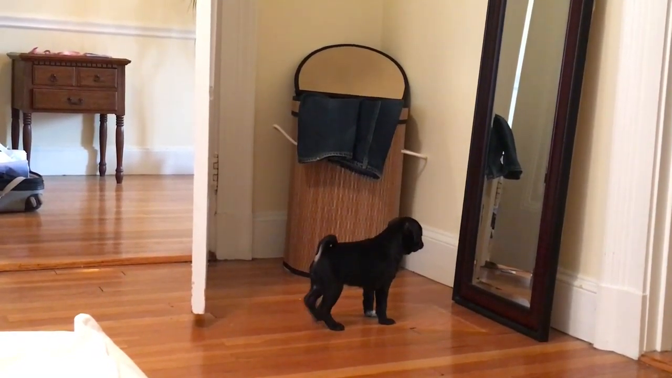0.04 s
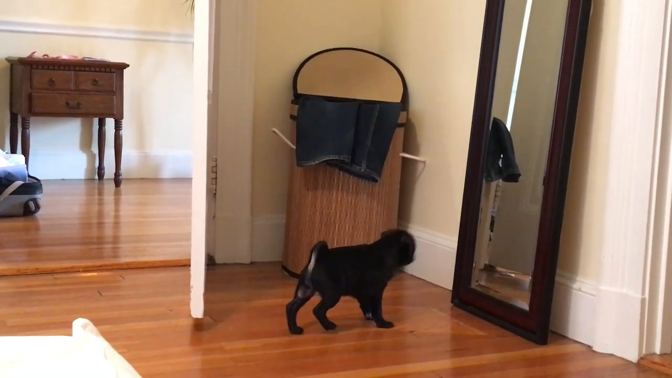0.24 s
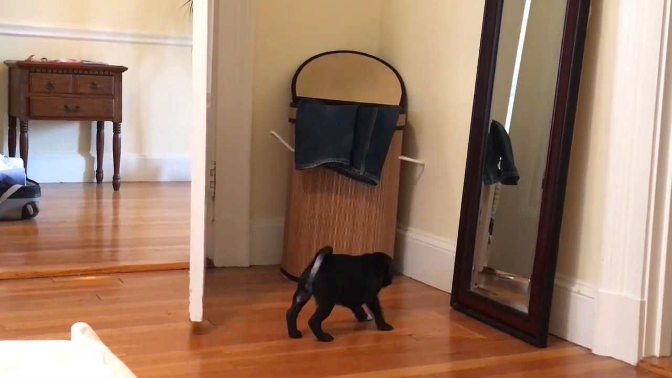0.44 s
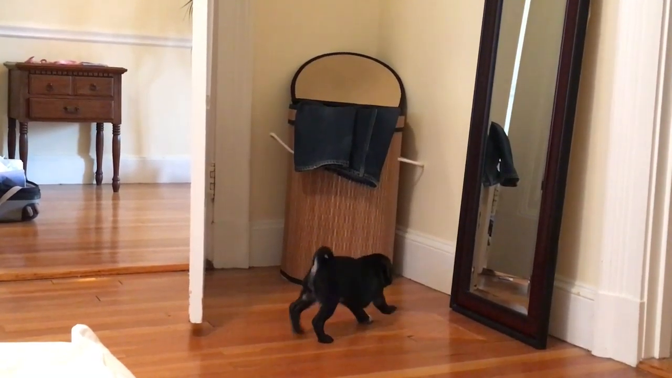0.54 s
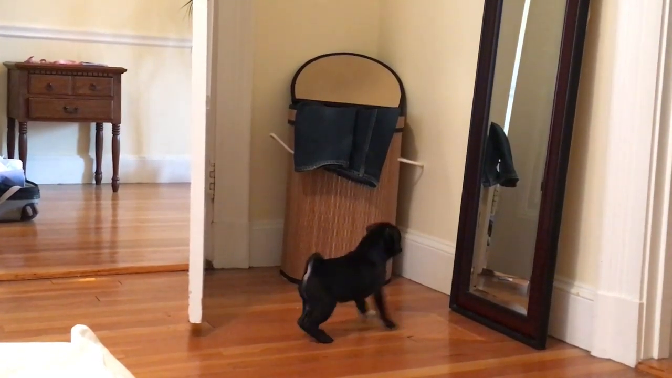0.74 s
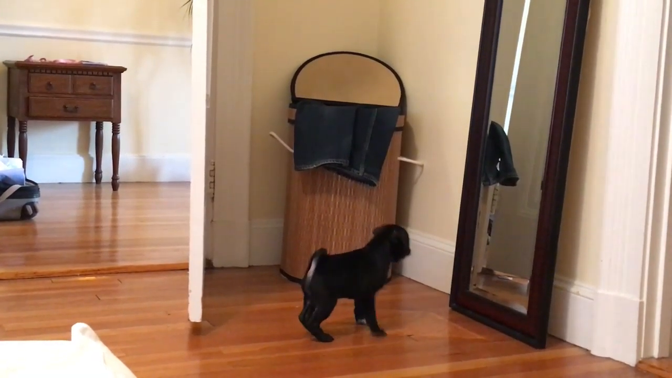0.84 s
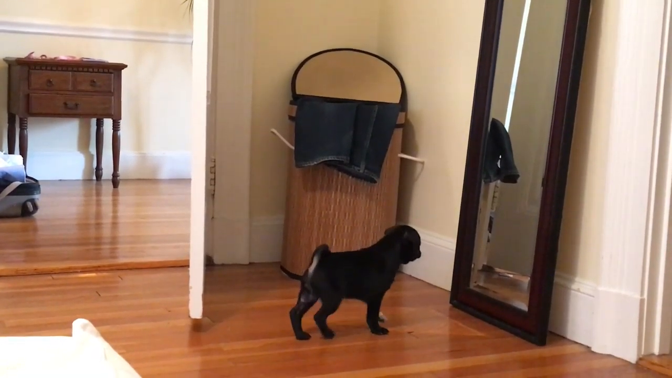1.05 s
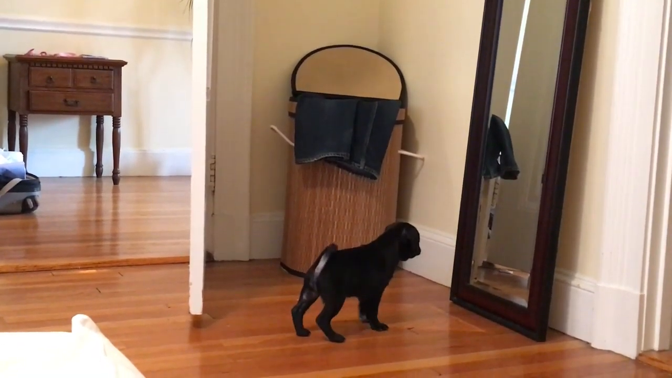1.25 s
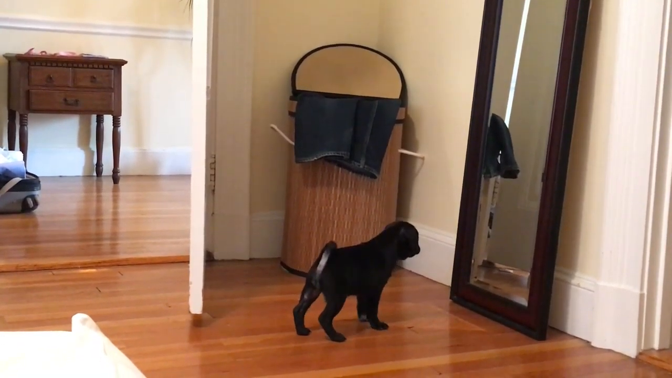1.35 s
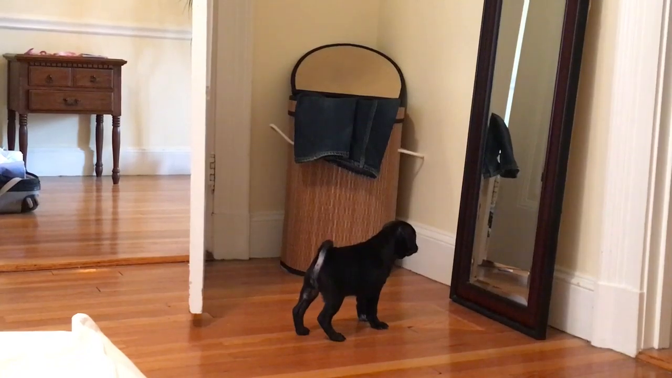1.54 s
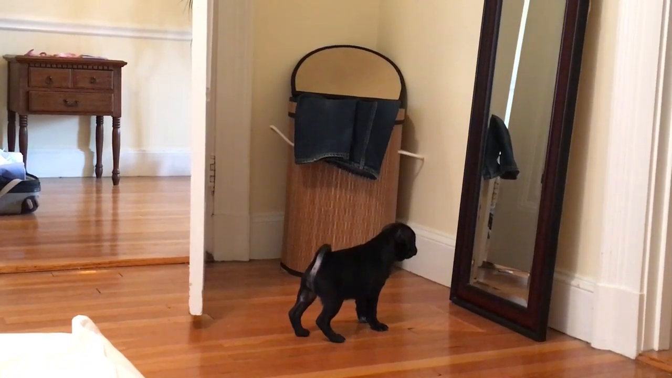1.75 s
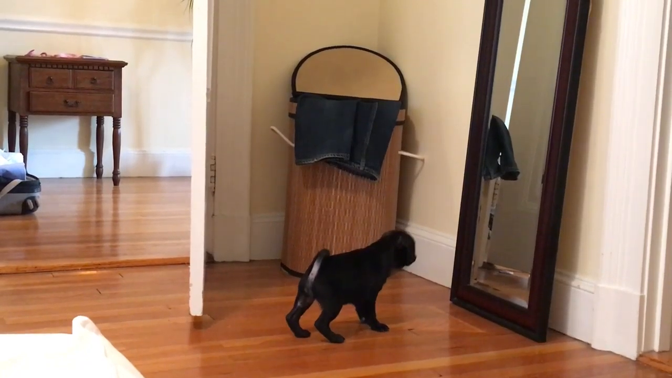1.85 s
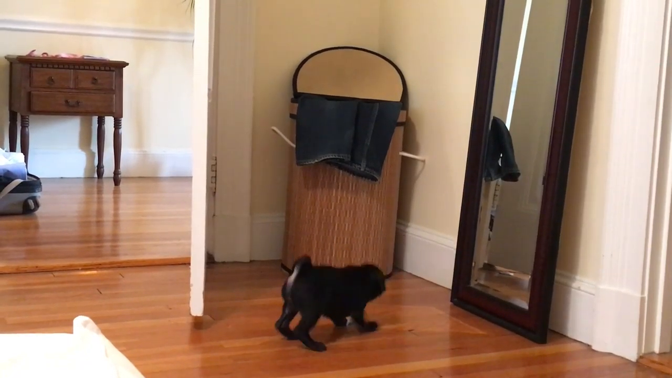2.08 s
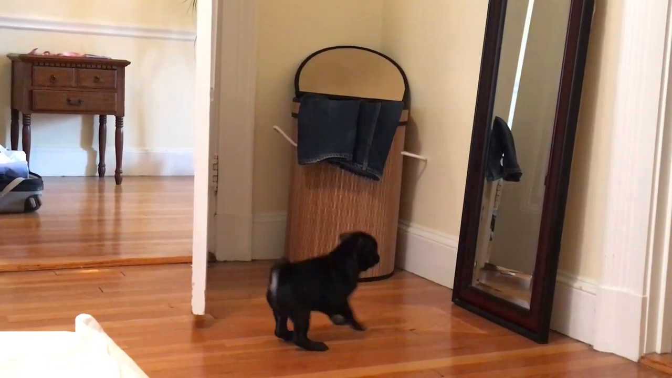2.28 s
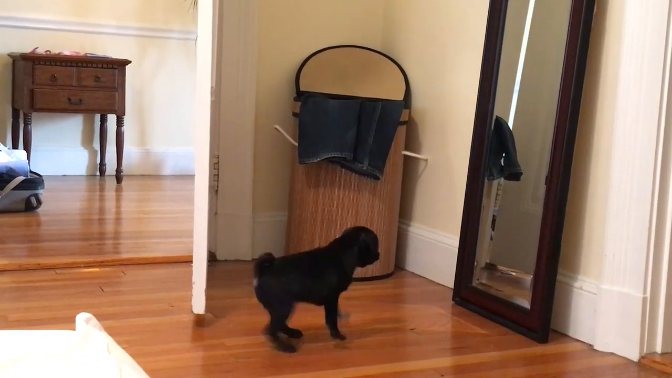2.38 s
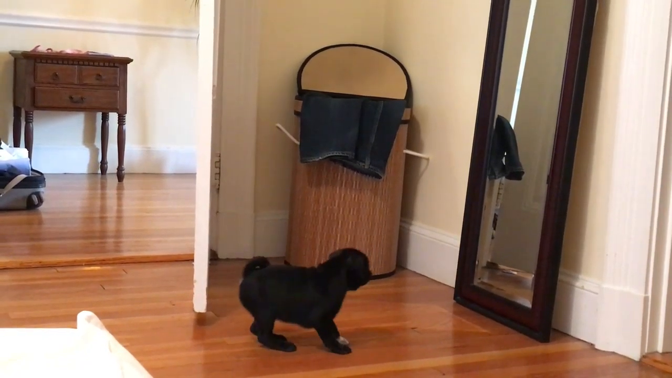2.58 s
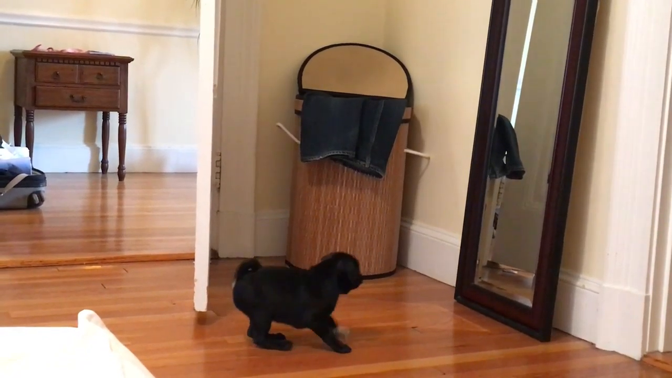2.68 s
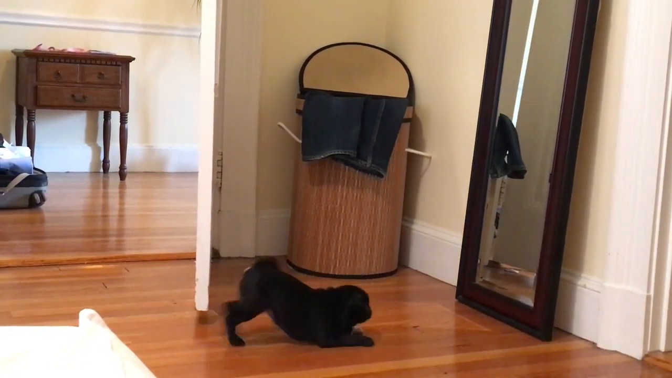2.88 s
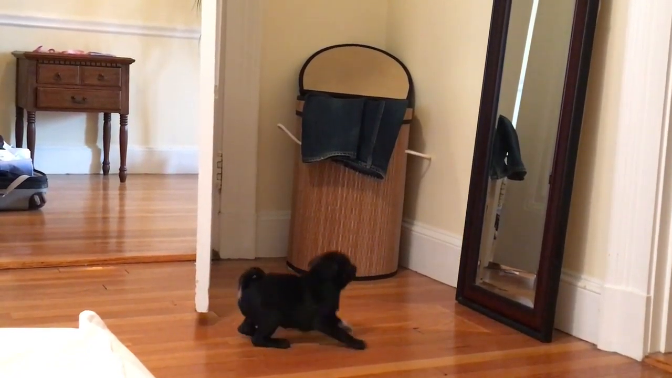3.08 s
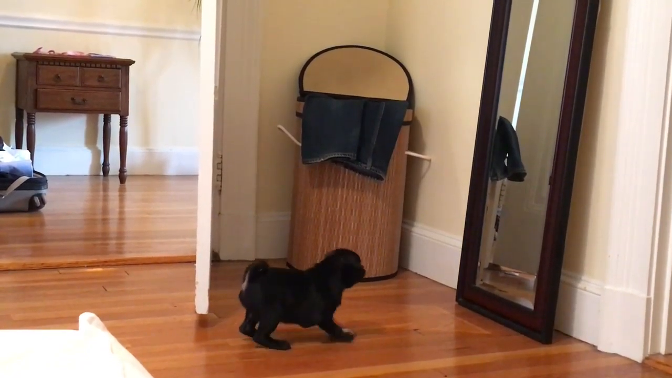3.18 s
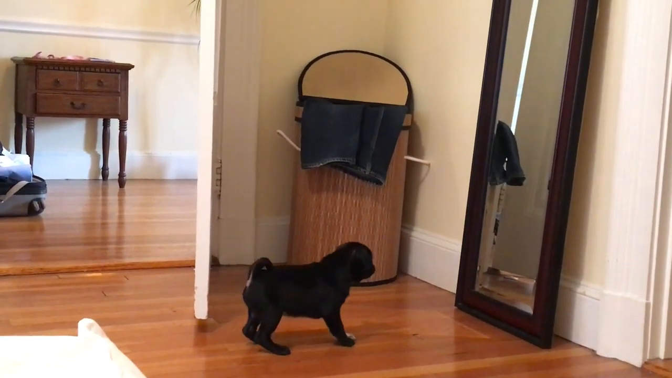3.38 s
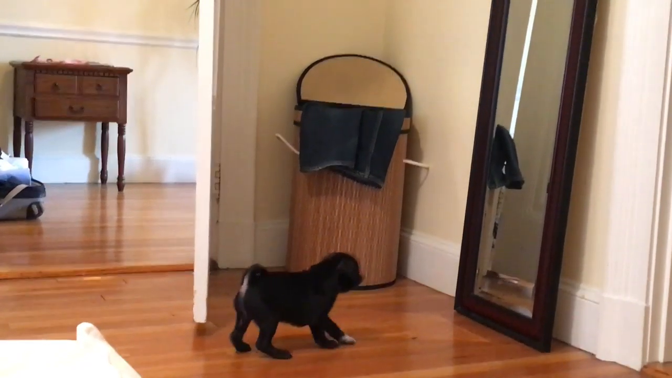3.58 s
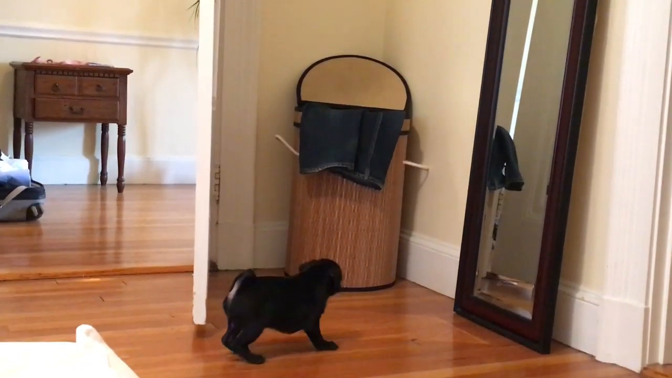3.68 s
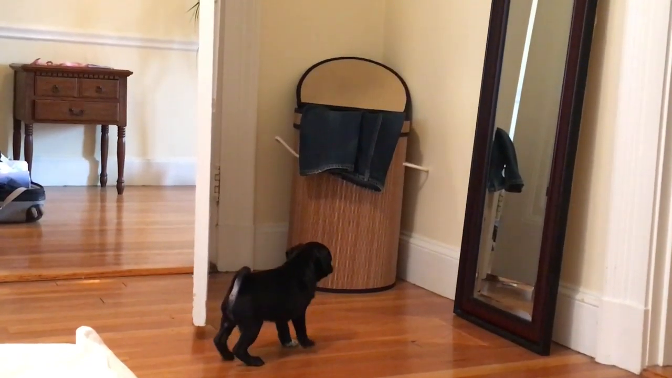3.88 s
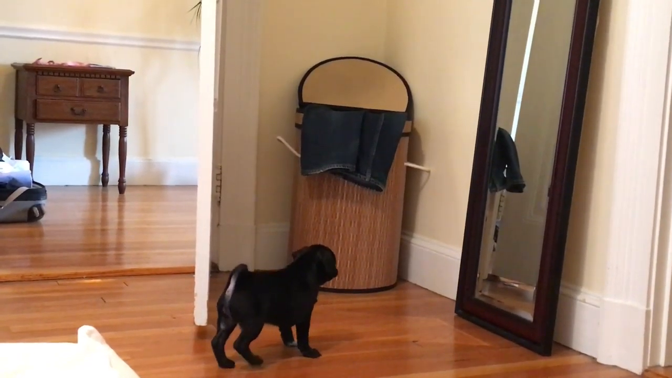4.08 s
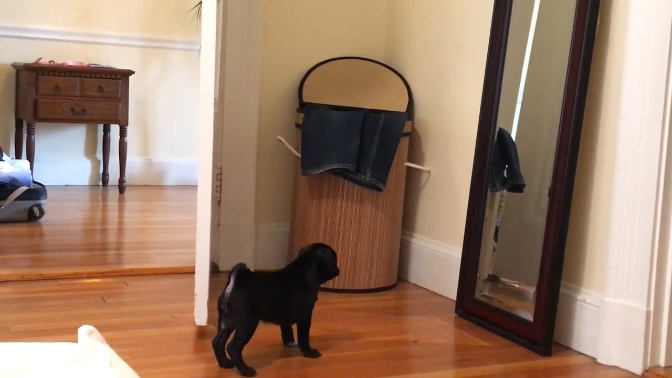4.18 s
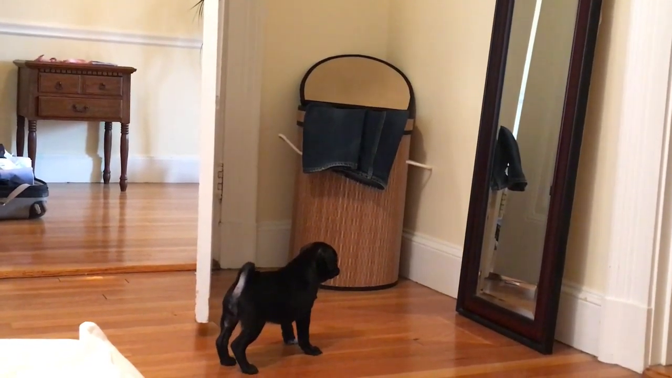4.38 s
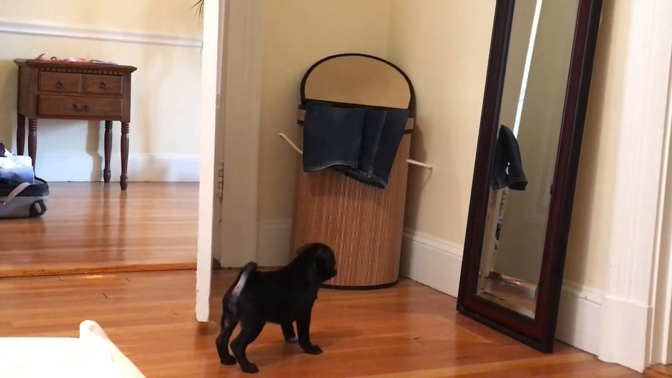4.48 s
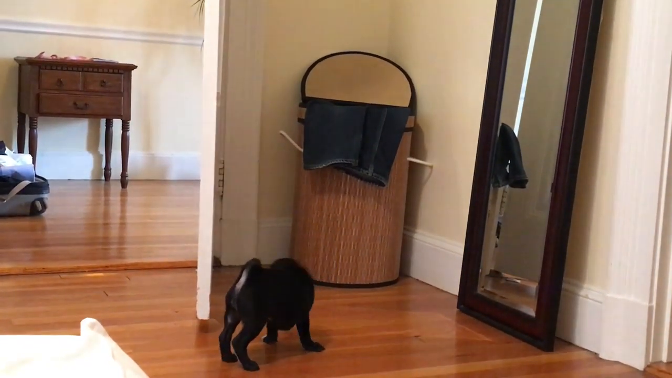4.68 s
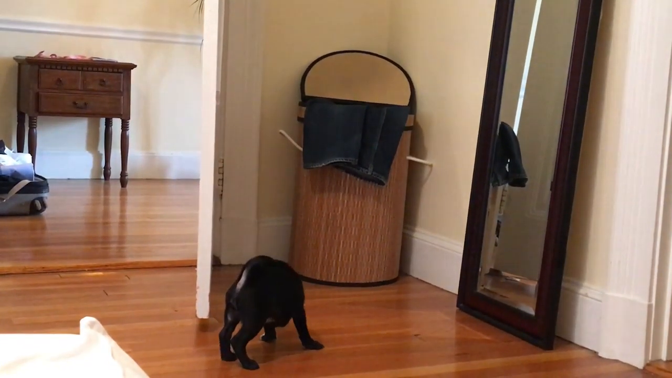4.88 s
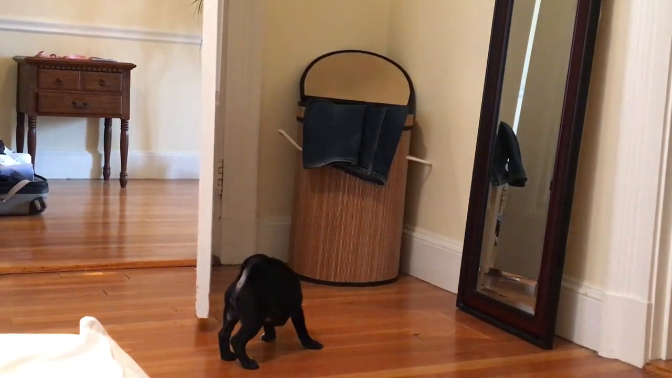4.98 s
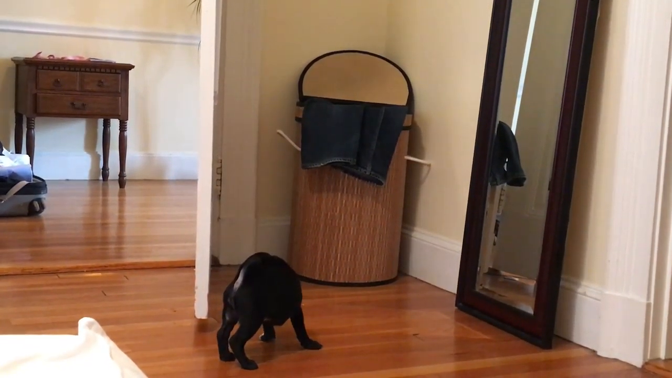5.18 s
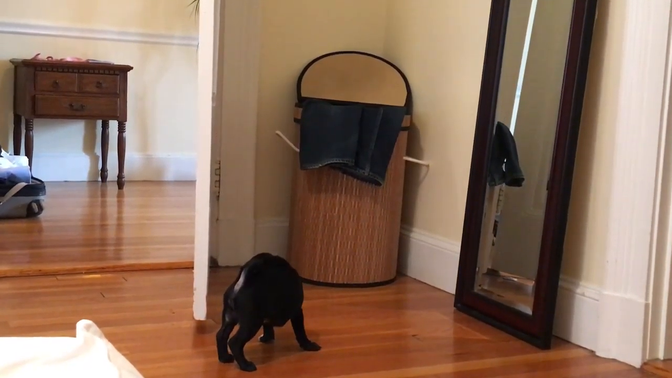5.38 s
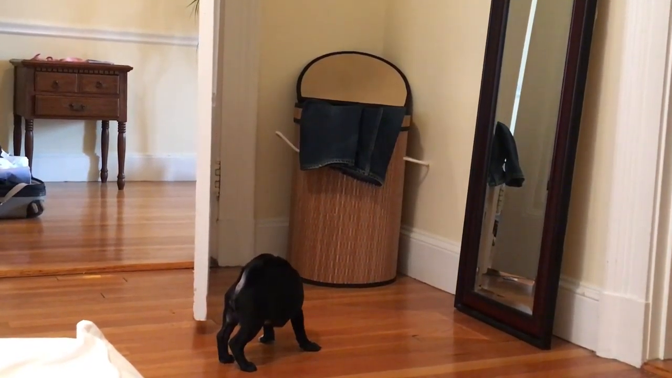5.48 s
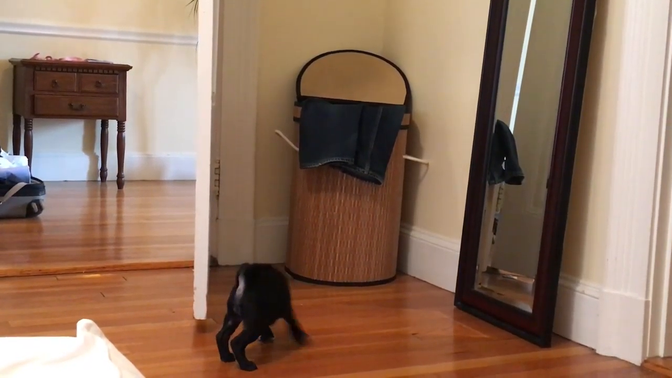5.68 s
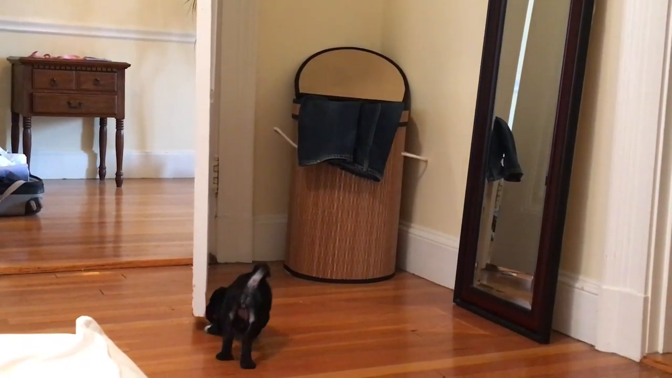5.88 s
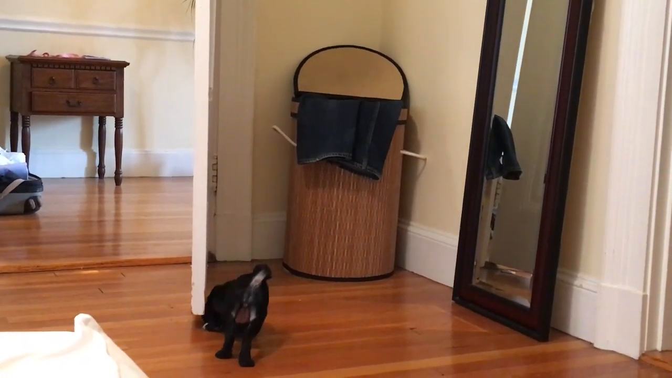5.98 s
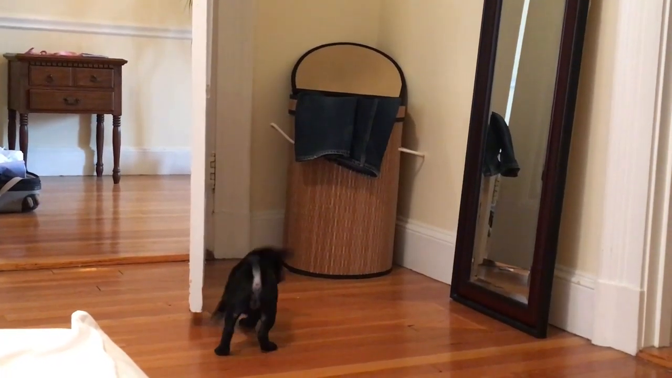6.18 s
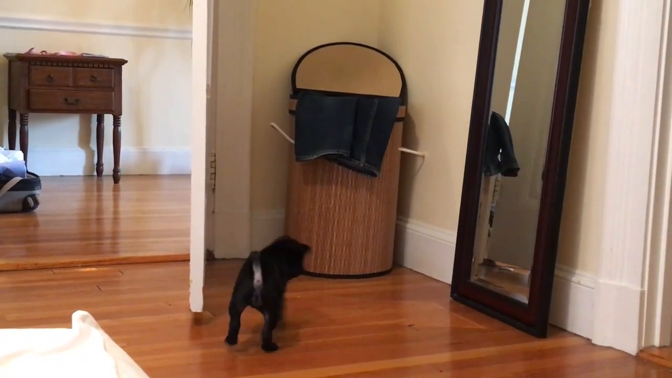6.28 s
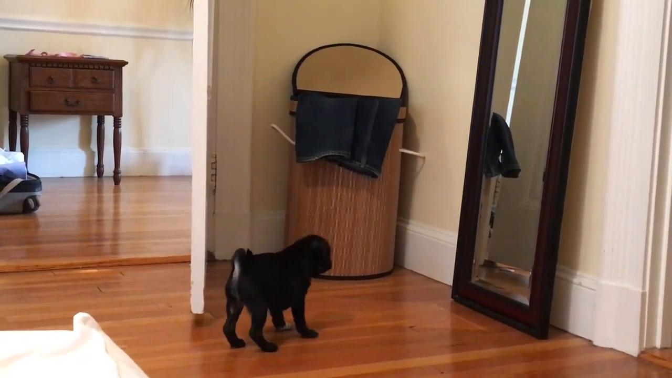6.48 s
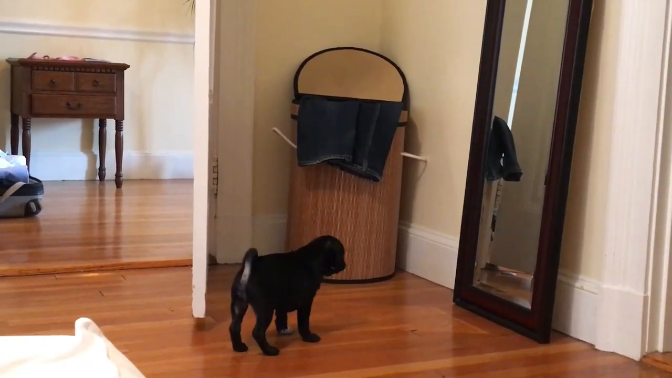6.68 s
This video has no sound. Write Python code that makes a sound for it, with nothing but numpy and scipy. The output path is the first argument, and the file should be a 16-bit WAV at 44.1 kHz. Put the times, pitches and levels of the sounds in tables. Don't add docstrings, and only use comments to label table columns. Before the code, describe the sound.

In a quiet, bare room with a wooden floor, a puppy scuffs about with ticking claws and a tiny squeak, then lets out a loud soaring yip and a rougher bark. Paws thump, a low growl sinks to a moan, and a rising whine follows. After a small yelp-grunt and more scuffling come a sinking whine and a weaker hoarse bark. One microphone a few steps away catches short wall echoes and faint house rumble.

```python
import sys
import numpy as np
from scipy import signal
from scipy.fft import rfft, irfft
from scipy.io import wavfile
from scipy.ndimage import uniform_filter1d, map_coordinates

SR = 44100
rng = np.random.default_rng(int(sys.argv[2]) if len(sys.argv) > 2 else 0)


def undo_db(level):
    steps = np.asarray(level, float) / 20
    return 10 ** steps


def file_out(sig):
    cols = np.atleast_2d(sig).T
    lim = np.clip(cols, -1, 1)
    pcm = np.round(lim * 32767).astype(np.int16)
    wavfile.write(sys.argv[1], SR, pcm)


N = 363825

# time_s, pitch_hz, level_db, roughness_0_to_1
WHINES = [
    [(.05, 1111, -72, 0.16), (.085, 1099, -50, 0), (.125, 1120, -58, 0.02), (.16, 1080, -70, 0.12)],
    [(.605, 1246, -40.5, .06), (.614, 1126, -42, 0.02), (.63, 1064, -39.5, 0), (.68, 1052, -46.5, 0.09),
     (.73, 1068, -68, 0.1)],
    [(4.558, 639, -59, 0.05), (4.64, 734, -44, .05), (4.68, 797, -36, 0), (4.715, 889.6, -35.5, 0),
     (4.74, 945, -38, 0), (4.79, 916.5, -52.5, 0.14)],
    [(7.218, 1122, -46.5, 0.22), (7.265, 883, -46.5, 0.15), (7.305, 805.4, -45, 0),
     (7.372, 800.7, -45.5, 0.07), (7.447, 768.5, -58, 0.15), (7.56, 723, -71.5, 0.2)],
]
# time_s, pitch_hz, level_db, roughness_0_to_1
BARKS = [
    [(2.079, 1067, -35.5, 0.04), (2.092, 1102, -21, 0.04), (2.104, 1256, -19, 0.04),
     (2.115, 1526, -22.5, .28), (2.143, 1679, -21, .4), (2.152, 2196, -21, .52), (2.19, 2325, -23, .45),
     (2.198, 896, -30.5, .6), (2.232, 420, -41.5, .5)],
    [(2.782, 893.3, -48, .4), (2.8, 881, -34.5, .42), (2.815, 900, -33, .3), (2.821, 950, -23, .15),
     (2.842, 1044, -25.5, .18), (2.856, 1124, -27.5, .35), (2.878, 1147, -28, .6), (2.9, 1078, -33, 0.7)],
    [(7.596, 499.5, -48.5, .75), (7.624, 760, -44.5, .6), (7.63, 850, -33, .2), (7.651, 936, -30, .28),
     (7.657, 1102, -31, .35), (7.678, 1120, -39.5, 0.41), (7.705, 1128, -41, .42), (7.725, 1080, -43, 0.38)],
]
# time_s, pitch_hz, level_db, roughness_0_to_1
GROWLS = [
    [(3.468, 180, -53.5, 0.68), (3.6, 190, -48.5, .75), (3.66, 255, -42, .4), (3.72, 300, -37, 0.22),
     (3.785, 285, -39.5, 0.25), (3.845, 220, -47.5, 0.39), (3.95, 213.6, -48, 0.41),
     (4.11, 191.3, -52, 0.42), (4.23, 159.5, -60, 0.59)],
    [(4.22, 160, -62, 0.74), (4.3, 150, -53, .35), (4.36, 154.2, -55.5, 0.04), (4.45, 180.1, -59.5, 0.09),
     (4.54, 188.2, -57.5, 0.06), (4.575, 235, -49.5, 0.64)],
    [(5.731, 1090, -43.5, .12), (5.741, 895, -40.5, .16), (5.755, 889.5, -39.5, .16),
     (5.772, 1022, -39.5, 0.1), (5.797, 850, -42.5, .12), (5.815, 554.5, -48.5, 0.41),
     (5.85, 333.5, -53.5, 0.4), (5.92, 231, -50.5, 0.73), (5.98, 202, -64.5, 0.64)],
]
# opening_at_rest_0_to_1, opening_at_full_effort_0_to_1, lag_s, steady_half_pitch_share_0_to_1
JAW = [(0.4, 0.16, 0.014, 0.01), (0.03, 0.52, 0.035, 0), (0.14, 0.28, .015, 0.02), (-.32, 0.57, 0.0063, 0),
       (.2, 1, .012, -.12), (.15, .97, 0.018, 0.6), (0, 0.9, 0.019, 0.05), (0, 0.14, 0.013, -.1),
       (0, 0, .02, 0.01), (0, 0.83, 0.0016, 0)]
# pairs of pitch_hz, lift_db, then one treble_slope_db_per_octave
TONGUE = [
    [(2110, 12.5), (5100, -9), (6600, 4.4), -5],
    [(1170, 1.8), (2130, -0.62), (5400, -15), (6500, 3.6), -12],
    [(2600, -10.5), (7030, 12), (490, -16), -0.95],
    [(2130, 7), (2900, -1.5), (510, -14.5), (330, -24), (790, 3.4), (2460, -27), (5250, -10), -22],
    [(2300, 1.5), (1200, 4), (1700, 2.5), (290, 7.7), (2850, -1.5), (3900, 3.5), -2.2],
    [(2330, -15.5), (3800, 6.8), (480, 9), (800, 3), (1450, 3.5), (1850, -4.5), -.6],
    [(2610, -21), (1330, -8.5), (2140, -5.5), (1690, -8.5), (4240, 3.1), (3350, 3), (5400, 7), (6500, 4),
     (353, 8), 10],
    [(630, 3.2), (192, 5.9), (308, -4), (680, 4.9), (960, 3.8), (1090, -8.5), -1.7],
    [(670, 4), (160, -2), (210, 5), (1330, -7), -1.4],
    [(1890, 4.1), (3130, 11.3), (5140, 3.9), -24],
]
# pitch_hz, lift_db
SOFT_TONGUE = [
    [(2200, 1)],
    [(2200, -1)],
    [(1400, -5), (2100, 4)],
    [(2400, -2), (3200, -6), (4000, -4), (4800, -4)],
    [(2500, -24), (3400, 12.5), (4500, 4), (5600, 4.5)],
    [(1450, 5.5), (2300, 2), (3700, 1.5)],
    [(850, 0.5), (3800, 2.5), (500, 1.5)],
    [(950, 3), (1400, -3), (1800, 4)],
    [(300, 6), (1800, 2)],
    [(1000, 2), (3400, 4), (5400, 5)],
]
BREATHY = [1.01, 0.79, 0.85, 0.78, .9, .9, .42, 0.94, 0.89, 0.47]
# time_s, lift_db, width_s
SOBS = [(2.116, 2, 0.0044), (2.128, 4, 0.0033), (2.1348, 3.5, .002), (2.142, 6, 0.0024), (2.156, 0.5, .002),
        (2.166, 3, .004), (2.229, 6, 0.0034), (2.824, 5, .006), (2.844, 2.5, 0.0036), (2.864, -4, .004),
        (2.874, 2.5, .004), (5.766, 2.5, .002), (5.777, 4, 0.0028), (5.795, 2.5, 0.0036), (7.346, 16, .011),
        (7.398, 15.5, 0.0082), (7.42, 20.5, 0.0091), (7.65, 3, 0.0025), (7.652, -6, 0.0022),
        (7.669, 2.5, 0.0028), (7.705, 9, 0.005), (7.732, 5, .003)]
# pitch_hz, level_db
MOUTH_SHUT = [(100, -4.5), (200, 8), (600, 2), (1000, -3.5), (1700, -14.5), (2300, -20.5), (3000, -44),
              (4300, -37), (5500, -40), (6800, -32.5), (8500, -44), (11000, -57.5), (13500, -48.5),
              (16000, -54.5)]
# pitch_hz, level_db
MOUTH_OPEN = [(100, -39.5), (400, -18), (800, -10.5), (1300, -1.5), (1850, -7.5), (2300, -1.5), (2800, -8),
              (3800, -7.5), (5000, -13), (6500, -22.5), (8000, -34.5), (10000, -29), (12000, -23.5),
              (16000, -33.5)]
# start_s, length_s, start_hz, end_hz, level_db
WHISTLES = [
    (.565, .038, 7170, 7650, -59),
    (0.618, 0.13, 7440, 6830, -71.5),
    (0.928, 0.316, 1800, 1770, -79),
]
# start_s, length_s, centre_hz, width_hz, level_db
SNIFFS = [(.378, .11, 1620, 470, -60), (.435, .065, 4650, 780, -67), (3.09, .03, 6760, 450, -59),
          (3.307, .051, 6330, 770, -71), (3.74, .072, 6500, 510, -61), (6.03, .07, 1500, 800, -63),
          (6.09, .07, 1950, 800, -62), (.414, .093, 10500, 6300, -68), (3.52, .14, 11500, 1600, -77),
          (7.85, .2, 6700, 800, -69), (6.232, .12, 7550, 1800, -66), (3.205, .06, 11000, 2700, -66),
          (7.306, .11, 13170, 1500, -74)]
# start_s, hold_s, body_db, hiss_db
SCUFFS = [(0.2, .1, -72.5, -67), (0.365, 0.134, -70, -71), (0.565, .04, -66.5, -73),
          (0.833, 0.25, -68.5, -68.5), (1.35, 0.61, -83, -78), (1.852, 0.022, -60, -65.5),
          (2.05, 0.013, -76, -71.5), (2.395, 0.18, -67.5, -67), (2.59, 0.015, -62, -64),
          (2.996, 0.073, -57, -62.5), (3.169, 0.071, -65, -62), (3.286, 0.029, -65, -80),
          (3.484, .2, -71.5, -76), (3.706, 0.06, -79, -64), (4.039, 0.0088, -76, -75),
          (4.24, 0.03, -80, -77), (4.777, 0.108, -67.5, -76.5), (5.35, 0.088, -84.5, -95.5),
          (5.793, 0.14, -56.5, -68), (6.064, 0.141, -71, -67), (6.229, 0.062, -59.5, -61),
          (6.422, .015, -66, -65.5), (6.496, 0.053, -72, -78), (7.629, 0.18, -64.5, -53.5),
          (7.846, 0.11, -70.5, -63), (7.996, 0.017, -66.5, -64), (8.189, 0.044, -69.5, -71.5)]
# pitch_hz, level_db
SCUFF_BODY = [(250, -12.5), (600, -5.5), (1200, -1), (1700, -2), (2500, -9.5), (4000, -12), (5500, -26.5)]
# pitch_hz, level_db
SCUFF_HISS = [(1760, -37), (3000, -7.5), (3980, -2), (4860, -8), (5890, 0), (7500, -4.5), (8090, -5),
              (9800, -6), (11600, -14), (15600, -5.5)]
# start_s, peak_db, knock_db (against the peak)
CLAWS = [(0.23, -44.5, -8), (0.381, -61, 5), (0.7374, -47, -3), (0.8586, -61, 7.5), (0.8974, -57, 0),
         (0.956, -49.5, -14), (1.072, -61, -22), (1.8626, -55.5, 13.5), (2.4394, -51.5, -18),
         (2.5262, -49.5, 5), (2.5945, -53.5, -3), (3.02, -41.5, -4.5), (3.179, -42, -28), (4.046, -50, -8),
         (4.2485, -58, -7), (5.783, -56, -25), (5.8588, -56, -19), (5.925, -53.5, 0), (6.149, -50.5, -18),
         (6.2305, -54.5, 10), (6.4355, -48, -23), (6.5015, -57.5, 6.5), (8.0006, -61, -10),
         (8.0344, -52.5, -5.5), (8.214, -55, -2.5)]
# start_s, peak_db
PAWS = [(0.248, -96), (0.736, -52), (0.869, -50.5), (1.46, -83), (2.19, -47), (2.537, -47.5),
        (2.904, -42.5), (3.048, -43), (3.118, -50.5), (3.262, -44.5), (4.779, -60), (5.852, -44.5),
        (6.086, -69.5), (6.433, -51), (8.012, -41)]
# pitch_hz, level_db, time_to_fall_60_db_s
BOARDS = [(55, -13.5, .35), (93.5, -3.5, 0.61), (132, 2.5, 0.33), (190, -9.5, 0.26), (290, -4.5, 0.21)]
# pitch_hz, time_to_fall_60_db_s
ROOM = [(200, 0.32), (1000, 0.3), (2400, 0.43), (4000, 0.36), (8000, .25), (15000, 0.14)]
# delay_s, level_db
WALLS = [(.0021, -2), (.0047, -4.5), (.0083, -5.5), (0.0132, -27), (.019, -6.5), (.027, -19)]
# pitch_hz, level_db
RUMBLE_COLOUR = [(12, -55.5), (20, -29.5), (54, 3), (72, 3), (87, -7.5), (119, 3.5), (145, -13.5),
                 (179, -5), (208, -12), (233, -13.5), (400, -22), (520, -57.5), (880, -120)]
# pitch_hz, level_db
AIR = [(150, -33.5), (250, -4), (458, -14), (526, -13), (593, -16.5), (730, -15.5), (1590, -19.5),
       (1860, -16), (2530, -24), (3120, -22), (15600, -30.5)]

EFFORT_POWER, HALF_PER_ROUGH = .7, 0.56
FLUTTER_DB, FLUTTER_PER_S, DRIFT = 8.5, 170, .04
WHISTLE_HZ = 150
SCUFF_RISE_S, RISE_PER_HOLD = .006, 0.18
BODY_FALL_DB_PER_S, HISS_FALL_DB_PER_S = 110.5, 130
RUMBLE_DB, AIR_DB = -66.5, -74.5
SHAKE_DB, SHAKE_GROWS, SHAKE_S = -61, .35, 0.17


def unit(x):
    return x / np.sqrt(np.mean(x ** 2) + 1e-20)


def along(points, hz):
    f, v = np.transpose(points)
    below = -120 if v[0] < 0 else v[0]
    return np.interp(np.log(hz + 1), np.log(f), v, left=below)


def wobble(rate, size=N):
    knots = rng.standard_normal(int(size * rate / SR) + 4)
    return map_coordinates(knots, [np.arange(size) * rate / SR])


def hiss(colour, size=N):
    hz = np.fft.rfftfreq(size, 1 / SR)
    noise = rfft(rng.standard_normal(size))
    return unit(irfft(noise * undo_db(along(colour, hz)), size))


def add(track, s, sound):
    part = track[max(round(s * SR), 0):][:len(sound)]
    part += sound[:len(part)]


def spread(rows):
    s, *cols = np.transpose(rows)
    t = np.arange(s[0], s[-1], 1 / SR)
    fade = np.clip(np.minimum(t - s[0], s[-1] - t) / .004, 0, 1)
    return s[0], fade, [np.interp(t, s, c) for c in cols]


def room(x, wet_db):
    hz, t, z = signal.stft(rng.standard_normal(int(.7 * SR)), SR, nperseg=256)
    tail = signal.istft(z * undo_db(-60 * t / along(ROOM, hz)[:, None]), SR, nperseg=256)[1]
    answer = np.pad(undo_db(wet_db) * tail / np.linalg.norm(tail), (300, 0))
    answer[0] = 1
    for s, db in WALLS:
        answer[round(s * SR)] += undo_db(db) * rng.choice([-1, 1])
    return signal.fftconvolve(x, answer / np.linalg.norm(answer))


def puppy():
    out = np.zeros(N)
    for rows, *manner in zip(WHINES + BARKS + GROWLS, JAW, TONGUE, SOFT_TONGUE, BREATHY):
        start, sound = call(rows, *manner)
        add(out, start, room(sound, wet_db=-1.0))
    return out


def call(rows, habit, tongue, soft_tongue, breathy):
    start, fade, (hz, db, rough) = spread(rows)
    db, effort, mouth, half = jaw(start, db, rough, *habit)
    rough, half, n = np.clip(rough, 0, 1), np.clip(half, 0, 1), len(hz)

    shake = (0.0075 + .09 * rough) * wobble(90, size=n)
    shake += .12 * rough * wobble(500, size=n)
    shake += DRIFT * rough * wobble(14, size=n)
    turn = np.cumsum(np.pi * hz * (1 + shake) / SR) + 1e-6
    top = np.floor(15900 / hz)
    pulses = (np.sin((2 * top + 1) * turn) / np.sin(turn) - 1) / np.sqrt(2 * top)
    pulses *= 1 + half * np.cos(turn)
    pulses *= undo_db(FLUTTER_DB * rough * wobble(FLUTTER_PER_S, size=n))
    rasp = rng.standard_normal(n) * (1 + 1.0 * np.cos(2 * turn))
    f, t, (clear, airy) = signal.stft(np.array([pulses, rasp]), SR, nperseg=512, noverlap=448)

    def at(control):
        return np.interp(t * SR, np.arange(n), control)

    def bumps(pairs):
        return sum(g * np.exp(-(np.log((f + 1) / c) / .12) ** 2) for c, g in pairs)

    air_share = np.outer(1 + f / 7000, breathy * at(rough)) + f[:, None] / 40000
    air_share = np.clip(air_share, 0, 1)
    opening = np.clip(at(mouth), -.3, 1.2)
    *lifts, slope_db = tongue
    shape = bumps(lifts) + slope_db * np.log2(np.maximum(f / 6500, 1))
    throat = np.outer(along(MOUTH_SHUT, f), 1 - opening) + np.outer(along(MOUTH_OPEN, f), opening)
    throat += shape[:, None] + np.outer(bumps(soft_tongue), 1 - at(effort))
    z = (np.sqrt(1 - air_share ** 2) * clear + air_share * airy) * undo_db(throat)
    z *= np.exp(-1j * 1.1 * (f[:, None] / 1000) ** 2 / (1 + f[:, None] / 5000))
    power = uniform_filter1d(np.sum(abs(z) ** 2, axis=0), size=9)
    sound = signal.istft(z / np.sqrt(power + 1e-12), SR, nperseg=512, noverlap=448)[1][:n]
    level_db = db + (1.6 + 3.4 * rough) * wobble(60, size=n)
    return start, unit(sound) * undo_db(level_db) * fade


def jaw(start, db, rough, rest, widest, lag, steady):
    t = start + np.arange(len(db)) / SR
    keep = np.exp(-1 / (abs(lag) * SR))
    effort = signal.lfilter([1 - keep], [1, -keep], undo_db(EFFORT_POWER * (db - db.max())))
    effort = effort / effort.max()
    sobs_db = sum(lift_db * np.exp(-((t - s) / width) ** 2) for s, lift_db, width in SOBS)
    return db + sobs_db, effort, rest + (widest - rest) * effort, steady + HALF_PER_ROUGH * rough


def nose():
    out = np.zeros(N)
    airs = [(s, length, a, b, WHISTLE_HZ, db) for s, length, a, b, db in WHISTLES]
    airs += [(s, length, a, a, width, db) for s, length, a, width, db in SNIFFS]
    for s, length, start_hz, end_hz, width_hz, db in airs:
        n = int(length * SR)
        turn = 2 * np.pi * np.cumsum(np.linspace(start_hz, end_hz, n)) / SR
        air = wobble(width_hz, size=n) * np.cos(turn) + wobble(width_hz, size=n) * np.sin(turn)
        add(out, s, room(undo_db(db) * signal.windows.tukey(n, .15) * air, wet_db=-1.5))
    return out


def scuffs():
    t = np.arange(N) / SR

    def stroke(s, hold, db, fall):
        rise = np.clip((t - s) / (SCUFF_RISE_S + RISE_PER_HOLD * hold), 0, 1) ** 2
        return rise * undo_db(2 * db - 2 * fall * np.clip(t - s - hold, 0, 1))

    body = np.sqrt(sum(stroke(s, hold, db, BODY_FALL_DB_PER_S) for s, hold, db, _ in SCUFFS))
    fizz = np.sqrt(sum(stroke(s, hold, db, HISS_FALL_DB_PER_S) for s, hold, _, db in SCUFFS))
    grain = 0.46 * wobble(30)
    dull = body * undo_db(grain + 2.4 * wobble(13)) * hiss(SCUFF_BODY)
    bright = fizz * undo_db(grain + 1.5 * wobble(13)) * hiss(SCUFF_HISS)
    return dull + bright


def feet():
    out, t = np.zeros(N), np.arange(SR // 2) / SR
    for s, db, knock_db in CLAWS:
        click = rng.standard_normal(len(t)) * undo_db(db - 7 - 60 * t / .008)
        tick = np.convolve(click, [1.0, .5, -0.74, -.5], "same")
        knock_hz = 1350 * rng.normal(1, 0.21)
        knock = np.sin(2 * np.pi * knock_hz * t) * undo_db(db + knock_db + 0.5 - 60 * t / .018)
        add(out, s, room((tick + knock)[:SR // 20], wet_db=-5.5))
    for s, db in PAWS:
        boom = np.zeros(len(t))
        for hz, board_db, t60 in BOARDS:
            fading = undo_db(board_db + rng.normal(0, 2) - 60 * t / t60)
            boom += fading * np.sin(2 * np.pi * hz * t * rng.normal(1, 0.027))
        add(out, s, undo_db(db - 5) * boom * (1 - np.exp(-t / 0.003)))
    return out


def house():
    t = np.arange(N) / SR
    shaken = np.zeros(N)
    for s, db in PAWS:
        swell = np.clip((t - s) / .03 + 1, 0, 1)
        decay = np.exp(-np.maximum(t - s, 0) / SHAKE_S)
        shaken += undo_db(SHAKE_DB + SHAKE_GROWS * (db + 49.0)) * decay * swell
    rumble = (undo_db(RUMBLE_DB) + shaken) * undo_db(1.7 * wobble(5)) * hiss(RUMBLE_COLOUR)
    return rumble + undo_db(AIR_DB + 0.51 * wobble(4.9)) * hiss(AIR)


def scene():
    return (puppy() + nose() + scuffs() + feet() + house())[None]


def band_limit(x):
    return signal.sosfilt(signal.butter(12, 15700, fs=SR, output="sos"), x)


def record(dry):
    hz = np.fft.rfftfreq(N, 1 / SR)
    treble_loss = undo_db(-4 * np.clip((hz - 13000) / 3000, 0, 1)) * (hz < 15750)
    heard = irfft(rfft(dry) * treble_loss, N)
    return band_limit(heard)


dry = scene()
out = record(dry)
file_out(out)
```